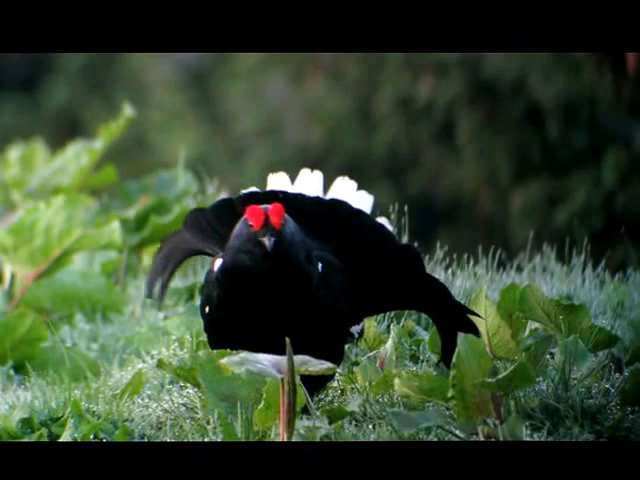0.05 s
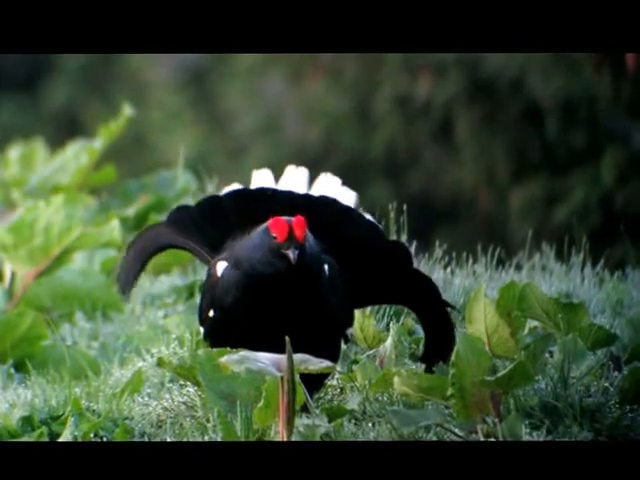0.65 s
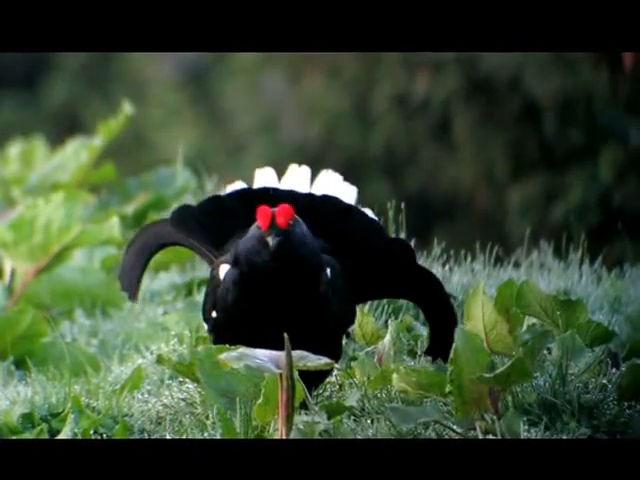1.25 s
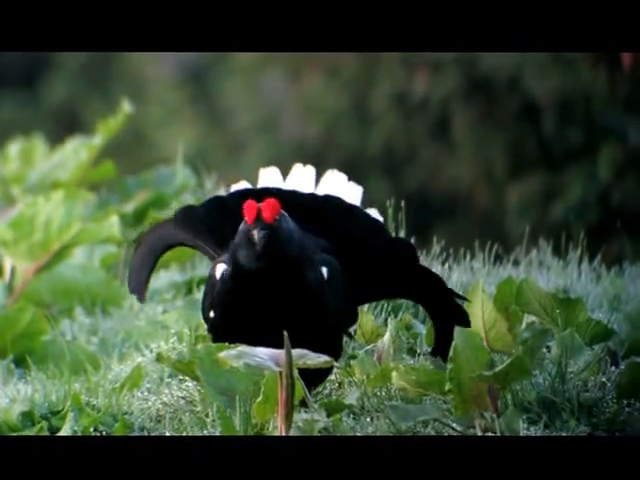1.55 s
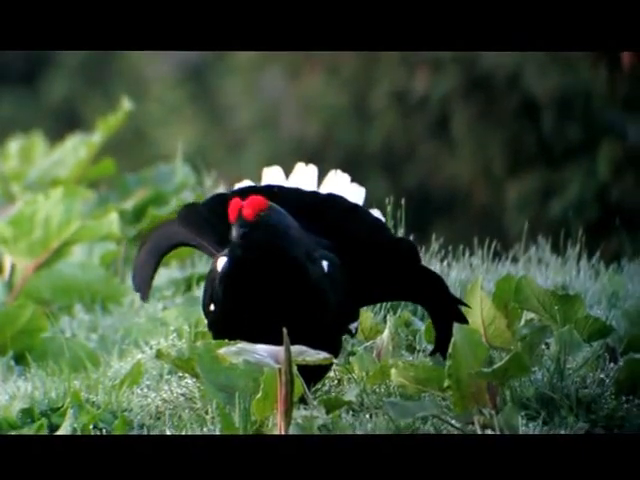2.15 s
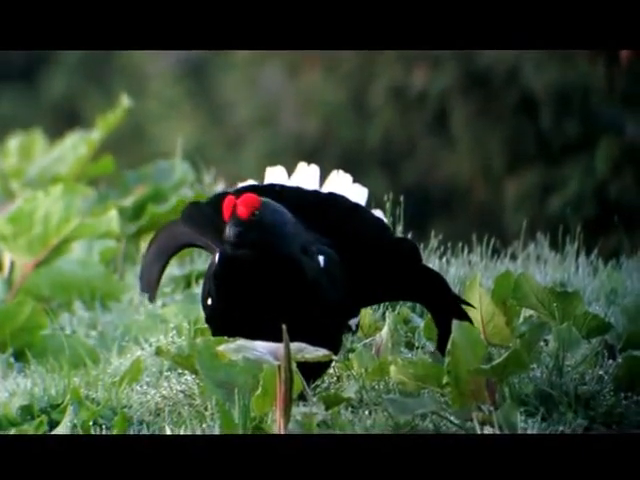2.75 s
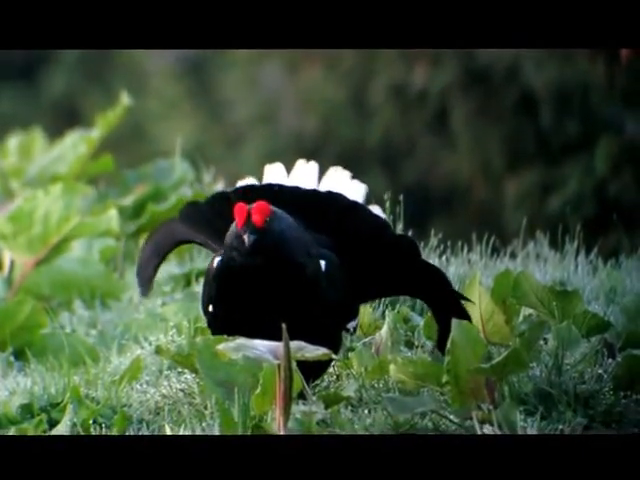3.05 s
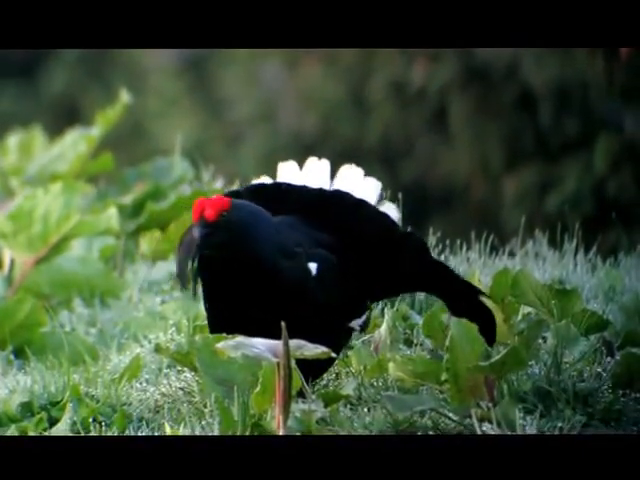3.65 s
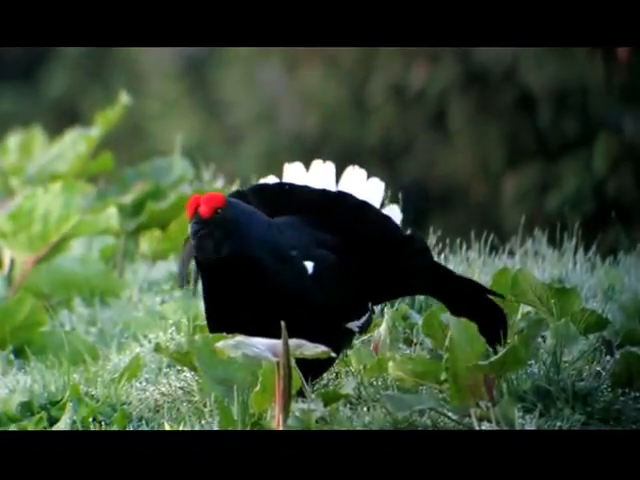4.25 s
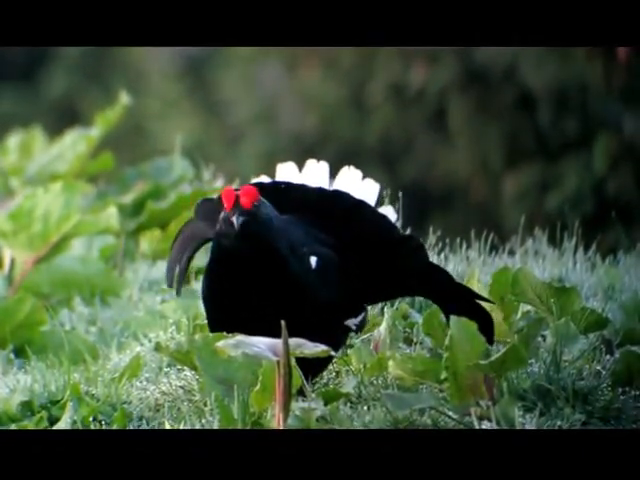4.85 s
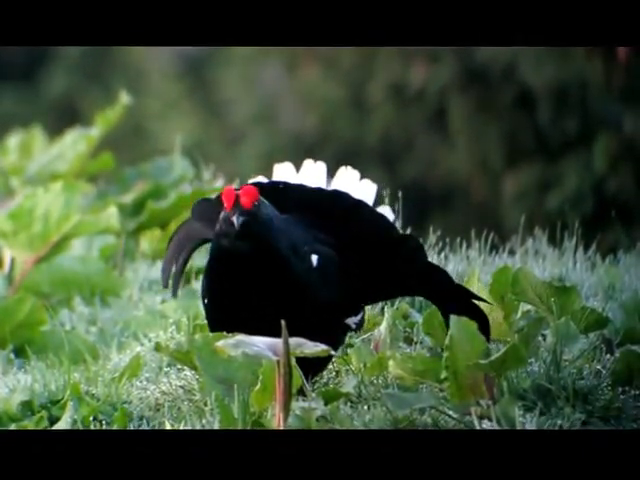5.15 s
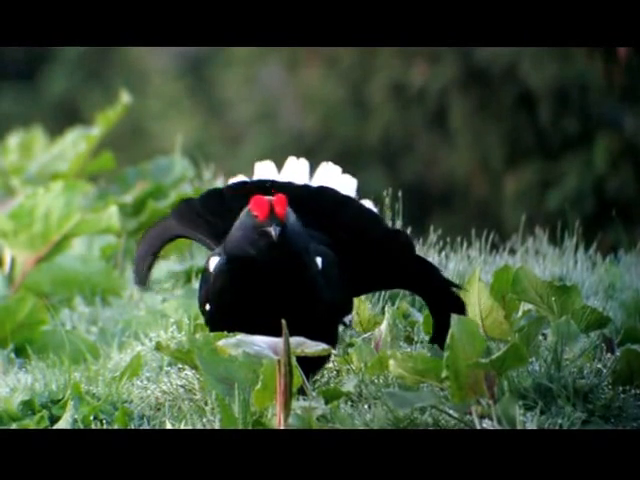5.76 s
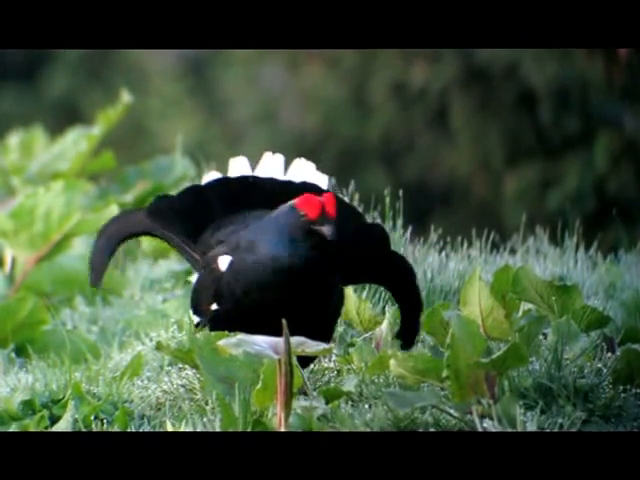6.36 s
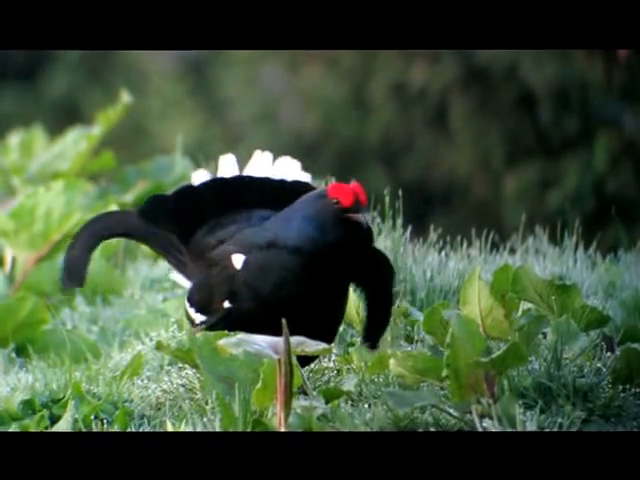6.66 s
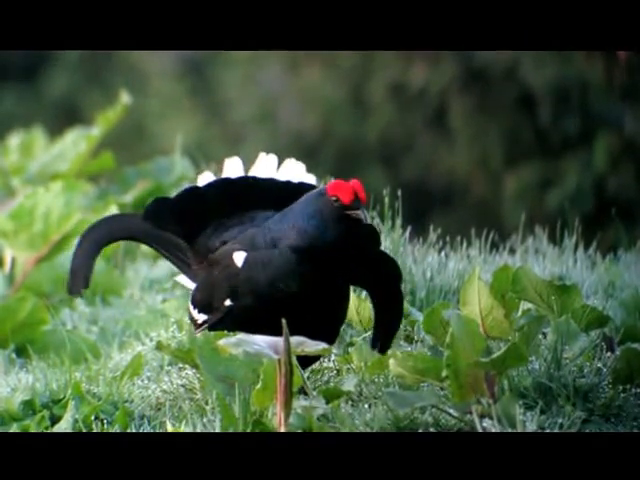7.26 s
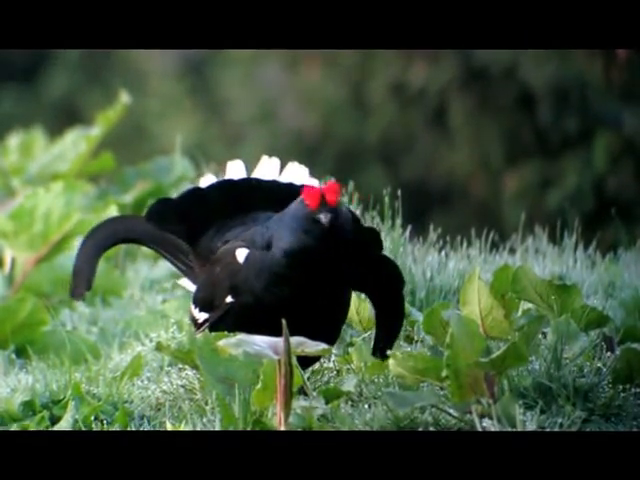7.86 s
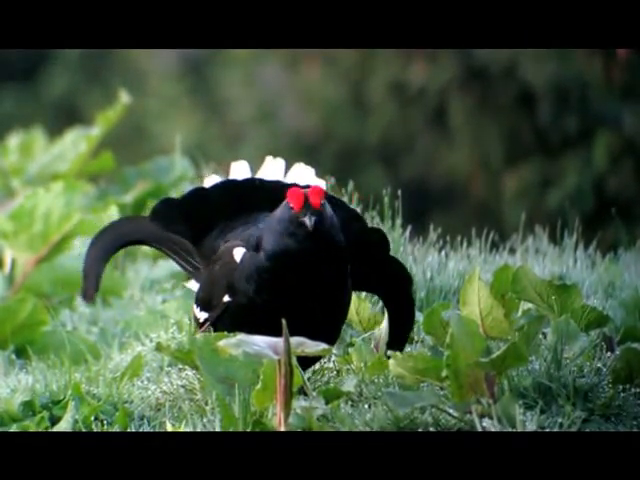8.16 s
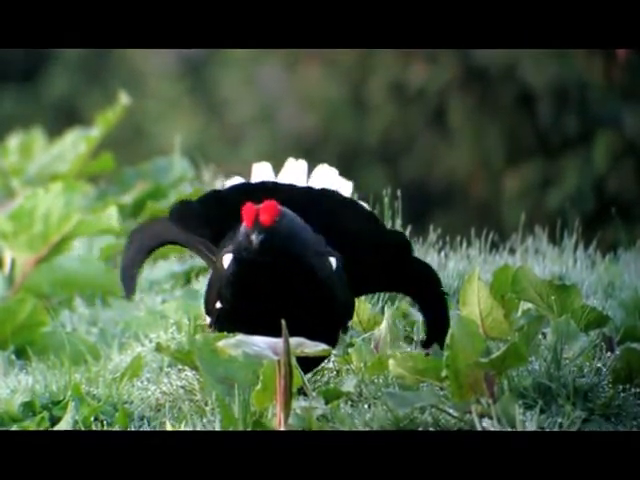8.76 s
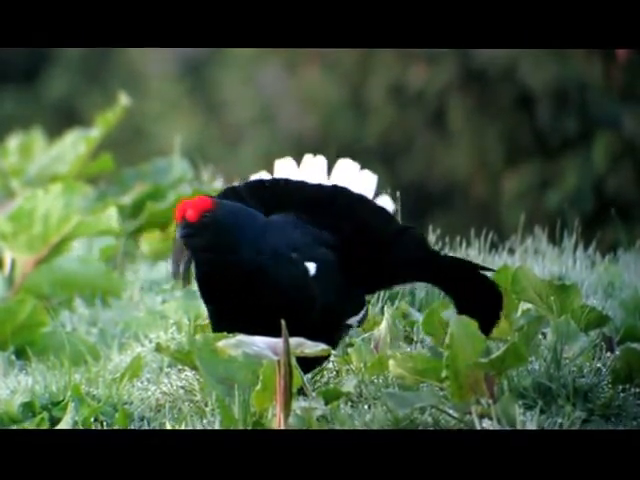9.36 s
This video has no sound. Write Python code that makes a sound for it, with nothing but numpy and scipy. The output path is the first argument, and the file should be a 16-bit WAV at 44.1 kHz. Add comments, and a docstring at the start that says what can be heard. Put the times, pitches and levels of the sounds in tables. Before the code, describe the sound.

A male black grouse sings close by in an open meadow, the loudest sound throughout. Four bouts begin at about 0, 2.8, 5.5 and 8.4 seconds. Each opens with four quick falling coos, followed half a second later by a little over a second of low, hollow, rapid bubbling. A quieter roll of falling notes swells into each next bout. Four small sharp ticks sound on the right at about 0.7, 1.8, 2.5 and 2.8 seconds, the first loudest. Songbirds whistle, rasp and twitter much more quietly behind, with a light forest echo, and are busier from 6 seconds to the end, near 9.7. The grouse's dull steps on turf are barely audible around 3.3 and 6.3 seconds and from 8.4 to 9.3. Underneath run a soft rumble and hiss of air and a very faint, thin high whine.

```python
"""Four loud coos and a run of bubbles: a black grouse sings close by on a mountain meadow.
It sings four bouts, and a quiet roll leads into each new one. Its voice is one low whistle that swells
whenever its gliding pitch crosses the resonance of the swollen throat. Something on the right ticks
four times. Songbirds whistle, rasp and twitter along the forest edge, which echoes them.
Underneath lie the grouse's soft steps, the rumble and hiss of the air, and a thin camera whine."""
import sys
import numpy as np
from scipy import signal
from scipy.io import wavfile
from scipy.ndimage import uniform_filter1d, map_coordinates

SR = 44100
rng = np.random.default_rng(int(sys.argv[2]) if len(sys.argv) > 2 else 0)


def log_audio(samples):
    """Write samples as a 16-bit WAV file to the path given in sys.argv[1]."""
    # one column per channel
    frames = np.atleast_2d(samples).T
    # limit to full scale, then quantise
    limited = np.clip(frames, -1, 1)
    pcm = np.round(limited * 32767).astype(np.int16)
    wavfile.write(sys.argv[1], SR, pcm)


N = 424241

# The bouts of song. Each row: start of the coos and start of the bubbles in seconds, effort in dB.
BOUTS = [(0.027, 0.53, -1), (2.76, 3.241, -0.63), (5.548, 6.017, -0.2), (8.388, 8.854, -0.5)]
# The four falling coos of a bout. Each row: seconds after the coos start, length in seconds,
# start and end pitch in Hz, effort in dB.
COOS = [(0.0018, 0.053, 608, 410, -21.1), (0.0666, 0.061, 631, 507, -19), (0.1368, 0.0556, 651, 500, -19.5),
        (0.204, 0.039, 680, 459, -19.5)]
# The bubbles of a bout, gliding up or down. Each row: seconds after the bubbles start,
# length in seconds, start and end pitch in Hz, effort in dB.
BUBBLES = [(-0.001, 0.0352, 550, 670, -30), (0.0338, 0.0321, 667, 493, -21),
           (0.1284, 0.0279, 704, 579, -15), (0.2362, 0.018, 480, 558, -23),
           (0.2749, 0.0234, 630, 491, -21.5), (0.318, 0.025, 437, 527, -22.5),
           (0.3558, 0.0227, 615, 462, -23), (0.3968, 0.022, 448, 545, -22), (0.429, 0.0171, 716, 376, -23),
           (0.447, 0.0666, 550, 665, -28.5), (0.5161, 0.0557, 663.5, 457, -23.5),
           (0.6583, 0.0171, 607, 565, -19), (0.681, 0.0235, 546, 647, -16.5),
           (0.7004, 0.0125, 628, 530, -15), (0.7312, 0.0256, 420, 640.3, -22.5),
           (0.7741, 0.0227, 641, 440, -20.5), (0.842, 0.021, 661, 601, -10.5),
           (0.9172, 0.0275, 540, 694, -17.5), (0.9408, 0.039, 667, 566, -14.5),
           (0.9948, 0.022, 507, 640, -19), (1.0224, 0.0214, 654, 488, -22.5),
           (1.0496, 0.01, 468, 698, -20.5), (1.0804, 0.0445, 655, 474, -21), (1.304, 0.0444, 624, 316, -24)]
def grouse(throat_hz=562, throat_width_hz=58.5, overtone_db=-45,
           roll_lead_s=0.062, roll_step_s=0.0677, bubbling_s=1.34):
    """A low whistle swells into a bubble each time its pitch crosses the throat's resonance."""
    voice = np.zeros(N)
    last_bout_end_s = -roll_step_s
    for coo_s, bubble_s, effort_db in BOUTS:
        effort = gain_of(effort_db)
        for early_s in np.arange(roll_lead_s, coo_s - last_bout_end_s, roll_step_s):
            add(voice, coo_s - early_s, effort * roll_note(early_s))
        for after_s, *sweep in COOS:
            add(voice, coo_s + after_s, effort * glide(*sweep, thin_db_per_octave=40.5, swell_db=-0.1))
        for after_s, *sweep in BUBBLES:
            add(voice, bubble_s + after_s, effort * glide(*sweep, thin_db_per_octave=25, swell_db=4.5))
        last_bout_end_s = bubble_s + bubbling_s
    tone = resonate(voice, throat_hz, throat_width_hz)
    octave = (signal.hilbert(tone) ** 2).real / abs(tone).max()  # squaring doubles the pitch
    return tone + gain_of(overtone_db) * octave


def glide(length_s, start_hz, end_hz, db, thin_db_per_octave, swell_db, easy_hz=503.2):
    """One coo or bubble: a shaky sweep that speeds up as it goes and weakens above the easy pitch."""
    progress = np.linspace(0, 1, round(length_s * SR))
    hz = start_hz + (end_hz - start_hz) * progress ** 1.143
    octaves_above = np.maximum(np.log2(hz / easy_hz), 0)
    level_db = db + swell_db * (progress - 0.5) - thin_db_per_octave * octaves_above
    shaky_hz = hz * (1 + 0.0039 * wander(len(hz), 150))
    return whistle(shaky_hz, level_db + 2 * wander(len(hz), 94.4), edge_s=0.0021)


def roll_note(early_s, length_s=0.0596, top_hz=535, end_hz=351, climb_hz_per_s=134.3, swell_s=0.062):
    """One falling note of the roll, early_s before the coos: later notes start higher and louder."""
    progress = np.linspace(0, 1, round(length_s * SR))
    start_hz = top_hz - climb_hz_per_s * early_s
    hz = start_hz + (end_hz - start_hz) * progress ** 1.105
    level_db = -30 + 14.5 * np.exp(-early_s / swell_s) + 2 * progress
    return whistle(hz, level_db + 1.4 * wander(len(hz), 90), edge_s=0.0089)


def throat_rasp(tone, rasp_db=-23):
    """Adds a soft rasp that follows the loudness of the grouse's voice."""
    loudness = abs(signal.hilbert(tone))
    return tone + gain_of(rasp_db) * loudness * noise_band(N, hz=440, width_hz=380)


# The ticks. Each row: start in seconds, level in dB, gain of the opening snap in dB.
TICKS = [(0.6517, -6, -8.5), (1.8219, -19.5, -16), (2.4865, -11.5, -22), (2.8199, -14, -20)]
# The notes the ticking casing rings with. Each row: pitch in Hz, gain in dB, seconds to fade by 60 dB.
CASING_NOTES = [(1173, -12, 0.068), (1450, 0.5, 0.026), (1593, 0.5, 0.034), (2080, -18.5, 0.061),
                (2496, -10, 0.041), (2830, -20, .014)]
def ticks(rise_s=0.000756, snap_s=0.0027, left_db=-11, rattle_db=-24, rattle_s=0.0091):
    """A small casing snaps, rings and briefly rattles, mostly on the right."""
    out = np.zeros((2, N))
    t = np.arange(3000) / SR
    rise = np.minimum(t / rise_s, 1)
    bass_cut = signal.butter(2, 1100, "highpass", fs=SR, output="sos")  # too small to give bass
    for start_s, db, snap_db in TICKS:
        for side, side_db in zip(out, (left_db, 0)):
            ring = np.zeros(len(t))
            for hz, note_db, fade_s in CASING_NOTES:
                phase = 2 * np.pi * hz * rng.uniform(0.94, 1.03) * (t - rise_s)
                ring += gain_of(note_db - 60 * t / fade_s) * np.cos(phase)
            burst = gain_of(snap_db) * np.exp(-t / snap_s) * rng.standard_normal(len(t)) / 2
            snap = signal.sosfilt(bass_cut, burst)
            rattle = noise_band(len(t), hz=2400, width_hz=1700)
            rattle *= gain_of(rattle_db) * np.exp(-t / rattle_s)
            add(side, start_s, gain_of(db + side_db) * (rise * (ring / 2 + rattle) + snap))
    return out


# The shapes of the songbirds' little tunes. Each row: seconds into the tune, pitch in Hz, level in dB.
ARCH = [(0, 2800, -40), (.018, 3000, -38), (.048, 2620, -39.5), (.058, 2560, -53), (.076, 2440, -35),
        (.094, 2290, -47)]  # an arch that sinks away
SLUR = [(0, 4080, -61), (.03, 3730, -42.5), (.066, 3437, -36), (.102, 3224, -35.5), (.112, 3070, -54),
        (.124, 3130, -27.5), (.137, 2780, -35.5), (.147, 2083, -44)]  # a long slide down that ends in a hook
CHIP = [(0, 2390, -53), (.008, 2888, -39), (.012, 3357, -35), (.015, 3958, -54), (.029, 3990, -54),
        (.033, 3610, -37.5), (.039, 2550, -36.5), (.047, 2470, -53.5)]  # a scratchy chip: up, a break at the top, down
TEE_YOO = [(0, 3470, -54), (.022, 3497, -46), (.034, 3444, -51), (.046, 3200, -54), (.056, 2962, -76),
           (.066, 2600, -73), (.08, 2380, -54.5), (.105, 2057, -58)]  # a soft high note, a pause, a low falling one
CREEP = [(0, 3150, -54), (.06, 3330, -49), (.11, 3520, -49.5)]  # a whistle that swells as it creeps upward
WARBLE = [(0, 2720, -48), (.013, 3160, -46), (.027, 4000, -50), (.05, 3010, -41.5), (.073, 2720, -66),
          (.085, 2800, -47), (.112, 3650, -43), (.13, 3900, -45.5), (.149, 3700, -51)]  # swings up twice
SWOOP = [(0, 2890, -51), (.02, 2350, -46.5), (.036, 2005, -39), (.06, 2014, -44), (.085, 2390, -41),
         (.112, 2630, -36), (.137, 2690, -32), (.153, 2466, -39), (.164, 2150, -42)]  # dips low, then arches over
DROP = [(0, 4750, -64), (.02, 4350, -65), (.042, 4000, -63)]  # a faint falling whistle, far off
PURR = [(0, 3200, -57), (.04, 3170, -51), (.085, 3100, -51), (.12, 3080, -56)]  # a purring note on an almost level pitch
# When each tune is sung. Each row: start in seconds, stretch (above 1 is slower), gain in dB.
ARCH_TIMES = [(.225, 1.2, -0.41), (0.49, 1, -0.25)]
SLUR_TIMES = [(6.249, 0.99, -0.64), (6.669, 1, 0.25)]
CHIP_TIMES = [(7.082, 0.93, -1.6), (7.497, 0.93, -0.11), (7.698, 1, 0.71), (8.279, 1.07, -2.2),
              (8.453, 1, 0.73)]
TEE_YOO_TIMES = [(7.332, 1, 1), (7.552, 1, -0.18), (8.196, 0.98, -0.74), (9.207, 0.98, -.5)]
CREEP_TIMES = [(7.228, 1, 0), (8.89, 1, 0.44)]
WARBLE_TIMES = [(1.07, 0.98, 0)]
SWOOP_TIMES = [(9.429, 0.94, 0)]
DROP_TIMES = [(6.161, 0.78, 0), (6.44, 1, -2), (6.588, 0.79, -1), (6.875, 1, 0)]
PURR_TIMES = [(7.945, 0.95, 0), (8.372, .9, 0), (8.838, .8, -1)]
def bird_tunes():
    """Songbirds sing a few short tunes; returns the direct sound and what reaches the trees."""
    return (sing(ARCH, ARCH_TIMES, echo_db=-5.5, jitter=0.013)
            + sing(SLUR, SLUR_TIMES, echo_db=-10.5, jitter=0.0088)
            + sing(CHIP, CHIP_TIMES, echo_db=-8, jitter=0.012)
            + sing(TEE_YOO, TEE_YOO_TIMES, echo_db=-20, jitter=0.0043)
            + sing(CREEP, CREEP_TIMES, echo_db=-15, jitter=0.0068)
            + sing(WARBLE, WARBLE_TIMES, echo_db=-6.5, jitter=0.008)
            + sing(SWOOP, SWOOP_TIMES, echo_db=-7.5, jitter=0.006)
            + sing(DROP, DROP_TIMES, echo_db=-11, jitter=0.008)
            + sing(PURR, PURR_TIMES, echo_db=-8.5, jitter=0.015, purr_db=5))


def sing(shape, times, echo_db, jitter, purr_db=0, purr_per_s=59):
    """One tune at each of its times, pulsing by purr_db; returns it and the share sent to the trees."""
    out = np.zeros(N)
    shape_s, hz, db = np.transpose(shape)
    for start_s, stretch, gain_db in times:
        t = np.arange(0, shape_s[-1], 1 / (SR * stretch))
        pitch = uniform_filter1d(np.interp(t, shape_s, hz), size=110, mode="nearest")  # rounds the turns
        purr = purr_db * np.cos(2 * np.pi * purr_per_s * t * stretch)
        level_db = np.interp(t, shape_s, db) + gain_db + purr
        add(out, start_s, bird_note(pitch, level_db, edge_s=0.0027, jitter=jitter))
    return np.array([out, gain_of(echo_db) * out])


def bird_note(hz, db, edge_s, jitter=0.0095, flutter_db=1.37):
    """A songbird's pure tone with a slight shake in pitch (jitter) and level (flutter)."""
    shaky_hz = hz * (1 + jitter * wander(len(hz), 398.7))
    return np.sqrt(2) * whistle(shaky_hz, db + flutter_db * wander(len(hz), 250), edge_s)


# Single whistles. Each row: start and length in seconds, start and end pitch in Hz,
# level in dB, gain of the forest echo in dB.
BIRD_WHISTLES = [(0.191, .031, 2934, 2330, -56, 4.5), (0.923, 0.11, 2190, 2240, -60, -11),
                 (0.943, .044, 7420, 3200, -56, 4), (0.965, 0.035, 7500, 3980, -55, -1),
                 (1.052, 0.02, 3150, 4280, -51.5, 1.5), (1.119, 0.048, 4250, 4040, -49.5, -5.5),
                 (1.465, .06, 6780, 6140, -58, -2), (1.676, .1, 6370, 7260, -58, 0.5),
                 (2.414, 0.019, 5200, 4500, -57, -7), (2.456, .02, 5220, 4550, -58, -5),
                 (2.528, .047, 5530, 4250, -53.5, -6), (2.911, 0.056, 5860, 5540, -57.5, -4),
                 (3.009, 0.045, 3480, 3050, -54.5, -4), (3.249, 0.074, 5900, 5940, -59, -3),
                 (3.378, 0.025, 3200, 3510, -52, -17), (3.488, 0.051, 5400, 4670, -55.5, -13),
                 (3.51, .021, 3040, 3500, -51.5, -12), (4.406, .18, 2306, 2340, -57, -16),
                 (4.627, .04, 3280, 3830, -56.5, -2), (7.824, .07, 2444, 2266, -52, -9),
                 (7.935, 0.047, 3170, 3370, -51.5, -16), (7.95, 0.19, 2400, 2296, -52, -9),
                 (9.204, 0.019, 4860, 4870, -54, -6), (9.305, 0.06, 6690, 6170, -47.5, 0.5),
                 (9.559, 0.068, 5520, 5040, -45.5, -6)]
def bird_whistles(bow=0.01435):
    """Slides whose pitch bows up a little midway; returns the direct sound and what reaches the trees."""
    direct, to_trees = np.zeros((2, N))
    for start_s, length_s, start_hz, end_hz, db, echo_db in BIRD_WHISTLES:
        progress = np.linspace(0, 1, round(length_s * SR))
        hz = (start_hz + (end_hz - start_hz) * progress) * (1 + bow * np.sin(np.pi * progress))
        note = bird_note(hz, db, edge_s=0.17 * length_s)
        add(direct, start_s, note)
        add(to_trees, start_s, gain_of(echo_db) * note)
    return np.array([direct, to_trees])


# Raspy notes. Each row: start and length in seconds, start and end pitch in Hz, level in dB.
BIRD_RASPS = [(.0, 0.052, 2226, 1945, -54), (1.706, 0.16, 2934, 2380, -56.5),
              (1.944, 0.32, 2030, 2047, -59.5), (2.154, 0.086, 2980, 2410, -54.5),
              (2.496, 0.29, 2080, 2045, -59.5), (2.684, 0.095, 3546, 2460, -54.5),
              (4.247, 0.052, 3440, 3190, -55.5), (5.235, 0.12, 4420, 2980, -59),
              (7.088, 0.011, 2500, 3240, -40), (8.63, 0.026, 2910, 1890, -50.5),
              (8.786, .027, 2690, 2110, -54), (8.821, 0.013, 2950, 1910, -48),
              (9.025, 0.023, 2945, 1920, -50.5)]
def bird_rasps(jitter=0.03, flutter_db=3, trill_per_s=80, trill_db=6, trill_bend=0.064):
    """A fast trill on a shaking pitch makes a songbird's note buzz."""
    out = np.zeros(N)
    for start_s, length_s, start_hz, end_hz, db in BIRD_RASPS:
        n = round(length_s * SR)
        phase = 2 * np.pi * trill_per_s * np.arange(n) / SR
        hz = np.linspace(start_hz, end_hz, n) * (1 + jitter * wander(n, 700) + trill_bend * np.sin(phase))
        pulse_db = trill_db * (np.cos(phase) - 0.5)  # each pulse is loudest as its pitch rises
        level_db = db + pulse_db + flutter_db * wander(n, 320)
        add(out, start_s, np.sqrt(2) * whistle(hz, level_db, edge_s=0.05 * length_s))
    return out


# Runs of distant twitter. Each row: start and stop in seconds, level in dB.
TWITTER_RUNS = [(0.096, .7, -76), (1.395, 2.3, -78), (2.3, 3.604, -58.5), (3.597, 4.344, -61.5),
                (4.596, 5.1, -63), (5.951, 6.95, -67), (9.06, 9.3, -64.5)]
def twitter(per_s=34, low_hz=3000, high_hz=5600, sweep=0.25, spread_db=4, jitter=0.011):
    """Far-off birds give quick random chirps, most of them falling, more of them low than high."""
    out = np.zeros(N)
    for start_s, stop_s, db in TWITTER_RUNS:
        times = np.arange(start_s, stop_s, 1 / per_s)
        for chirp_s, (late, height, slope, length, loud) in zip(times, rng.random((120, 5))):
            position = np.linspace(-1, 1, round((0.0143 + 0.026 * length) * SR))
            middle_hz = low_hz * (high_hz / low_hz) ** (height ** 2)
            hz = middle_hz * (1 + sweep * (slope - 0.65) * position + jitter * wander(len(position), 535))
            add(out, chirp_s + late / per_s, whistle(hz, db + spread_db * (2 * loud - 1), edge_s=0.012))
    return out


# The grouse treads round. Each row: time in seconds, level in dB.
FOOTSTEPS = [(3.31, -49), (6.299, -58), (8.406, -44), (8.515, -46.5), (8.8, -49), (9.214, -43),
             (9.281, -47)]
def footsteps(decay_s=0.0086):
    """Each foot presses the turf with a dull puff."""
    out = np.zeros(N)
    t = np.arange(5000) / SR
    swell = t / decay_s * np.exp(1 - t / decay_s)
    for step_s, db in FOOTSTEPS:
        puff = swell * noise_band(len(t), hz=150, width_hz=170)
        add(out, step_s - 0.008, gain_of(db) * puff)  # starts early to peak on the step
    return signal.sosfilt(signal.butter(2, 60, "highpass", fs=SR, output="sos"), out)


# How long the forest rings. Each row: frequency in Hz, seconds to fade by 60 dB.
FOREST_FADE = [(500, 0.93), (2500, 0.81), (4000, 0.87), (8000, 0.14)]
def forest_echo(sound, echoes_per_s=3000, build_s=0.0059, near_db=9, near_s=0.046, likeness=0.81):
    """Scattered echoes: a burst from the nearest trunks, then a long tail from the wood."""
    echoes = rng.standard_normal((2, SR)) * (rng.random((2, SR)) < echoes_per_s / SR)
    echoes[1] = likeness * echoes[0] + np.sqrt(1 - likeness ** 2) * echoes[1]  # right resembles left
    hz, t, spectrum = signal.stft(echoes, SR, nperseg=256)
    fade_db = near_db * np.exp(-t / near_s) - 60 * t / look_up(FOREST_FADE, hz)[:, None]
    build_up = 1 - np.exp(-t / build_s)
    tail = signal.istft(spectrum * gain_of(fade_db) * build_up, SR, nperseg=256)[1]
    return signal.fftconvolve(sound[None], tail / np.linalg.norm(tail[0]), axes=1)[:, :N]


# The tone of still air and microphone hiss. Each row: frequency in Hz, relative level in dB.
AIR_TONE = [(20, -19.5), (45, -9), (90, 1), (140, 5), (220, 0), (350, 2.5), (700, -3.5), (1000, -4),
            (2000, -10), (3600, -15), (5000, -18), (7000, -17.5), (8000, -20), (10500, -24.5)]
# How alike left and right are. Each row: frequency in Hz, likeness from -1 (opposite) to 1 (the same).
AIR_LIKENESS = [(50, -0.66), (150, -0.66), (300, -0.55), (700, -0.58), (2000, -0.47), (4000, 0.18),
                (10000, 0.29)]
def air(level_db=-46, patchy_db=2):
    """Soft rumble and hiss: shaped noise with drifting louder and quieter patches."""
    hz = np.fft.rfftfreq(1024, 1 / SR)
    noise = rng.standard_normal((5, N // 256 + 5, len(hz))).transpose(0, 2, 1)  # layer, frequency, time
    left, unrelated = noise[0] + 1j * noise[1], noise[2] + 1j * noise[3]
    likeness = look_up(AIR_LIKENESS, hz)[:, None]
    right = likeness * left + np.sqrt(1 - likeness ** 2) * unrelated
    patches = uniform_filter1d(noise[4], size=12, axis=0)
    patches = unit_level(uniform_filter1d(patches, size=20, axis=1))
    spectrum = np.array([left, right]) * gain_of(look_up(AIR_TONE, hz)[:, None] + patchy_db * patches)
    hiss = signal.istft(spectrum, nperseg=1024, noverlap=768)[1][:, :N]
    return gain_of(level_db) * unit_level(hiss)


def port_note(level_db=-59, left_db=-9):
    """Air rings in the right microphone's opening with a faint hollow note."""
    return gain_of(level_db) * noise_band(N, hz=1200, width_hz=110) * gain_of([[left_db], [0]])


# The tones of the camera's whine. Each row: pitch in Hz, level in dB.
WHINE_TONES = [(6190, -71.5), (6611, -77.5), (9900, -86)]
def camera_whine():
    """Thin, high tones that waver very slightly."""
    return sum(np.sqrt(2) * whistle(hz + 2 * wander(N, 20), db, edge_s=0.01) for hz, db in WHINE_TONES)


# The slow stirring of the air. Each row: time in seconds, boost of the rumble in dB.
DRAFTS = [(0, 4), (1.6, 0.5), (2.5, 3), (4.2, 2), (4.8, 2.5), (5.7, 2), (6.3, 4), (7, 2.5), (7.7, 2),
          (8.4, 2), (9.5, 3.5)]
def drafts(sound, below_hz=220):
    """Slow drafts swell and ease only the low rumble of a sound."""
    rumble = signal.sosfiltfilt(signal.butter(2, below_hz, fs=SR, output="sos"), sound)
    boost_db = np.interp(np.arange(N) / SR, *np.transpose(DRAFTS))
    return sound + rumble * (gain_of(boost_db) - 1)


def gain_of(db):
    """Turns decibels into a number to multiply by."""
    return 10 ** (np.asarray(db) / 20)


def unit_level(sound):
    """Scales a sound to an average (rms) level of 1."""
    return sound / np.sqrt(np.mean(sound ** 2) + 1e-20)


def look_up(table, hz):
    """Reads between a table's rows, with frequency spaced by octaves."""
    row_hz, values = np.transpose(table)
    return np.interp(np.log(hz + 1), np.log(row_hz + 1), values)


def add(mix, start_s, sound):
    """Mixes a sound in at start_s, cutting what falls outside."""
    start = round(start_s * SR)
    sound = sound[max(-start, 0):]
    part = mix[max(start, 0):][:len(sound)]
    part += sound[:len(part)]


def wander(n, rate_hz):
    """A smooth random wobble, n samples long and about 1 in size."""
    points = rng.standard_normal(4000)
    return map_coordinates(points, [np.arange(n) * rate_hz / SR], order=2, mode="wrap")


def resonate(sound, hz, width_hz):
    """A resonance: lets through what lies near hz and weakens the rest."""
    decay = np.exp(-np.pi * width_hz / SR)
    return 2 * signal.lfilter([1 - decay], [1, -decay * np.exp(2j * np.pi * hz / SR)], sound).real


def noise_band(n, hz, width_hz):
    """Noise passed twice through a resonance, at level 1."""
    return unit_level(resonate(resonate(rng.standard_normal(n), hz, width_hz), hz, width_hz))


def whistle(hz, db, edge_s):
    """A pure tone that follows a pitch curve and fades in and out over edge_s."""
    t = np.arange(len(hz)) / SR
    fade = np.clip(np.minimum(t, t[-1] - t) / edge_s, 0, 1)
    return fade * gain_of(db) * np.sin(2 * np.pi * np.cumsum(hz) / SR)


def scene(grouse_db=0.32, twitter_db=3.5, ground_db=-11, ground_delay_s=0.0032,
          grouse_echo_db=-20, rasp_echo_db=-6, twitter_echo_db=-4):
    """The grouse in front, songbirds behind it, the air all round."""
    bubbling = gain_of(grouse_db) * throat_rasp(grouse())
    rasps, chirps = bird_rasps(), twitter()
    notes, to_trees = bird_tunes() + bird_whistles()
    song = notes + rasps + gain_of(twitter_db) * chirps
    add(song, ground_delay_s, gain_of(ground_db) * song)  # song from the trees bounces off the ground
    slightly_right, slightly_left = gain_of([[-0.4], [0.4]]), gain_of([[0.4], [-0.4]])
    direct = bubbling * slightly_right + song * slightly_left
    to_trees += gain_of(grouse_echo_db) * bubbling
    to_trees += gain_of(rasp_echo_db) * rasps + gain_of(twitter_echo_db) * chirps
    events = direct + forest_echo(to_trees) + ticks() + footsteps()
    return events + drafts(air() + port_note() + camera_whine())


def record(dry, limit_db=-12, dip_db_per_db=0.55, recover_db_per_s=7, dip_s=0.002, top_hz=10430):
    """Automatic gain dips after a sharp peak and creeps back; then the highest treble is cut."""
    peak_db = 20 * np.log10(abs(dry).max(0) + 1e-9)
    recovery_db = np.arange(N) * recover_db_per_s / SR
    held_peak_db = np.maximum.accumulate(peak_db + recovery_db) - recovery_db
    over_db = np.maximum(held_peak_db - limit_db, 0)
    smoothing = np.exp(-1 / (dip_s * SR))
    dip_db = dip_db_per_db * signal.lfilter([1 - smoothing], [1, -smoothing], over_db)
    low_pass = signal.firwin(511, top_hz, window=("kaiser", 9), fs=SR)
    return signal.oaconvolve(dry / gain_of(dip_db), low_pass[None], "same")


dry = scene()
out = record(dry)
log_audio(out)
```